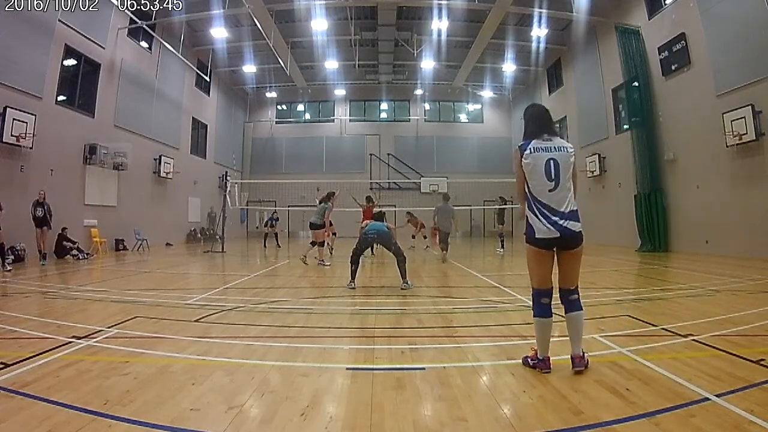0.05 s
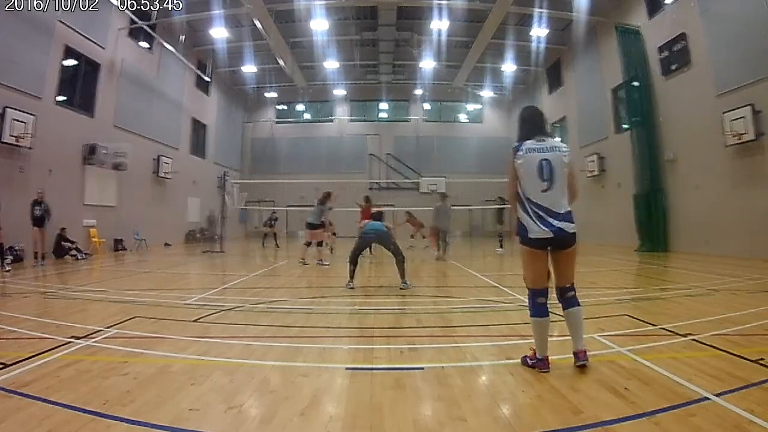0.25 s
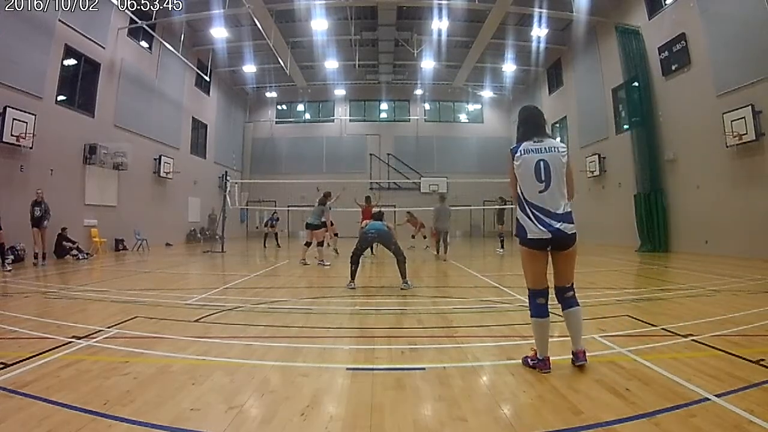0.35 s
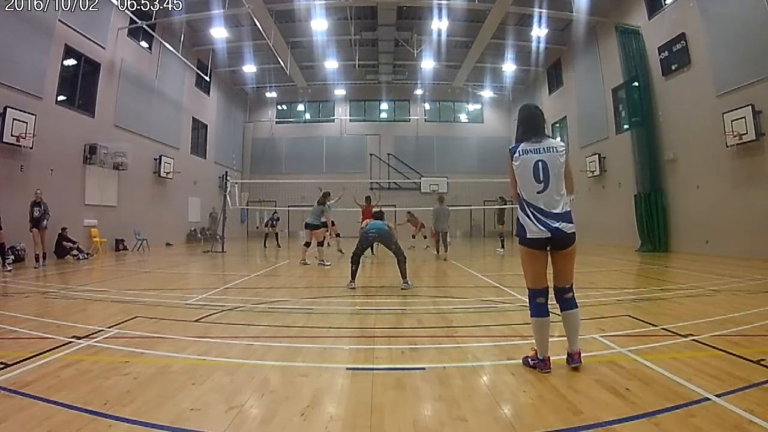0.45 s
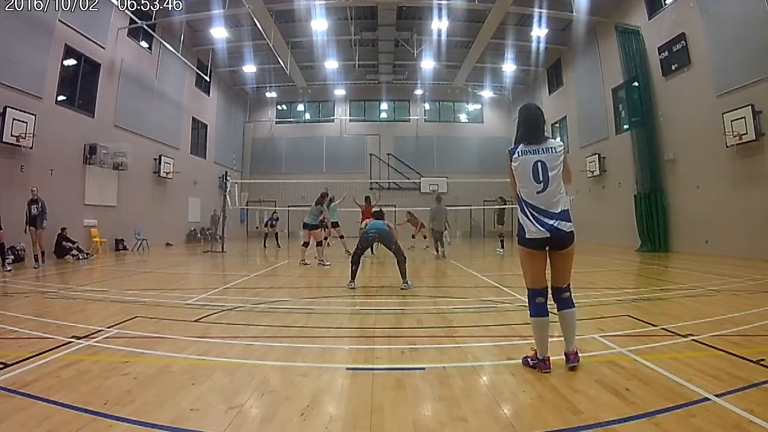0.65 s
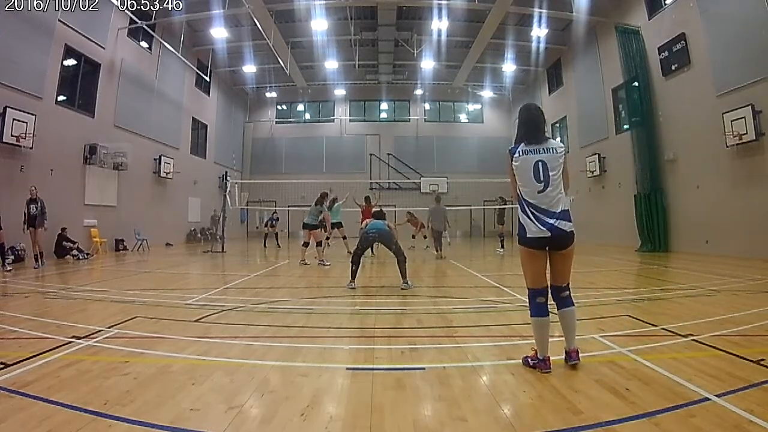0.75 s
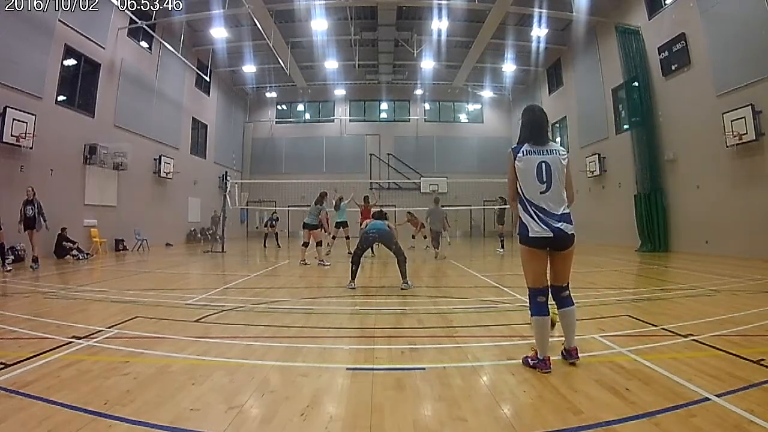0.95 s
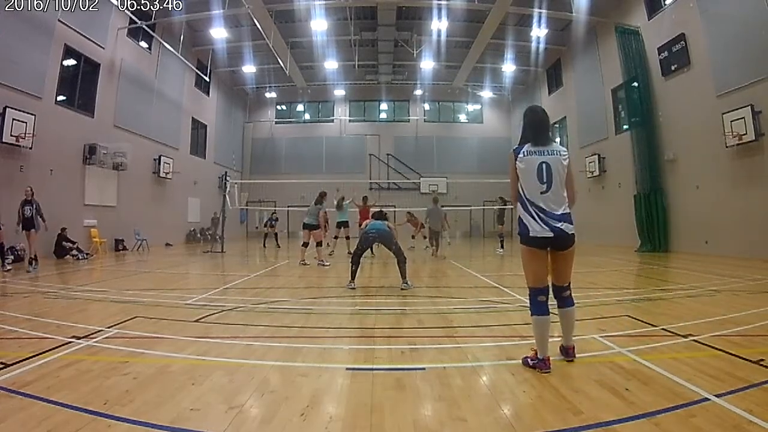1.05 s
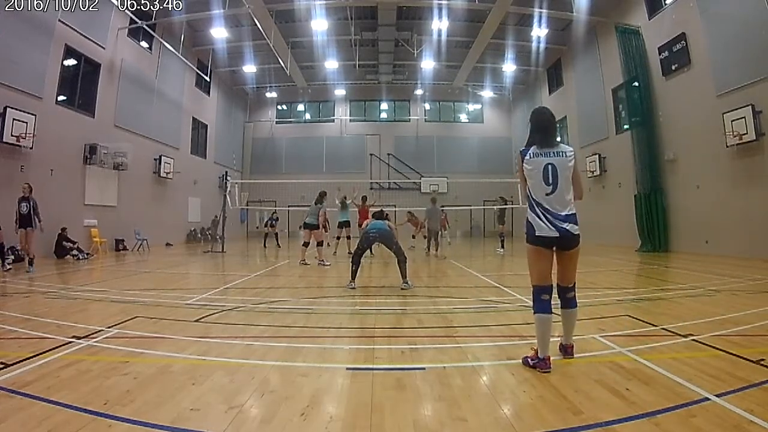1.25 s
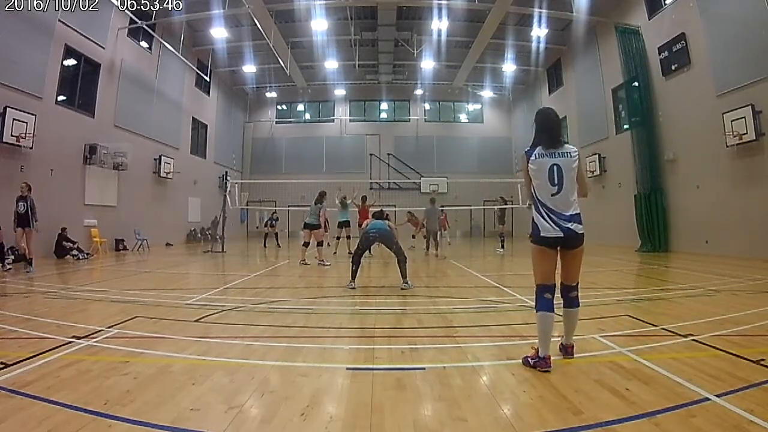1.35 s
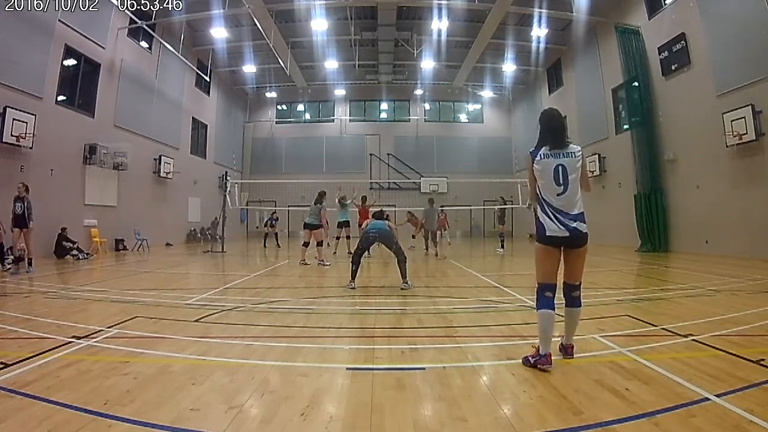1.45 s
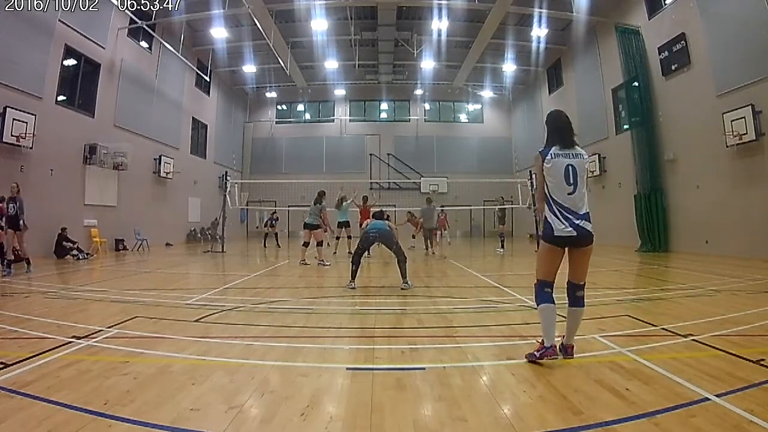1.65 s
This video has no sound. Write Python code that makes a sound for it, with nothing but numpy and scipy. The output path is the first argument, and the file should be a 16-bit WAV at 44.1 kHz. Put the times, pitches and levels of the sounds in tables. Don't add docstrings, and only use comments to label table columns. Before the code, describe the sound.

Two deep, booming ball bounces alternate with lighter palm slaps in an echoing indoor gym.

```python
import sys
import numpy as np
from scipy import signal
from scipy.fft import rfft, irfft, next_fast_len
from scipy.io import wavfile
from scipy.ndimage import uniform_filter1d

SR = 44100
rng = np.random.default_rng(int(sys.argv[2]) if len(sys.argv) > 2 else 0)


def int16_out(signal):
    q = np.round(np.clip(np.atleast_2d(signal).T, -1, 1) * 32767)
    wavfile.write(sys.argv[1], SR, q.astype(np.int16))


def gain_from_db(level_db):
    decades = np.asarray(level_db, float) / 20
    return 10 ** decades


N = 74970
LEAD = 22050


def along(points, hz):
    f, value = np.transpose(points)
    return np.interp(np.log(hz + 1), np.log(f + 1), value)


def coloured(x, points):
    m = 2 * next_fast_len(x.shape[-1] // 2 + 4096)
    log_gain = np.log(gain_from_db(along(points, np.fft.rfftfreq(m, 1 / SR))))
    cepstrum = irfft(log_gain, m)
    cepstrum[1:m // 2] *= 2
    cepstrum[m // 2 + 1:] = 0
    response = np.exp(rfft(cepstrum))
    return irfft(rfft(x, m) * response, m)[..., :x.shape[-1]]


def coloured_evenly(x, points):
    impulse = np.eye(1, 4096)[0]
    return coloured(x, points) / np.linalg.norm(coloured(impulse, points))


def unit(x):
    return x / np.sqrt(np.mean(x ** 2) + 1e-20)


def add(track, s, x):
    part = track[LEAD + round(s * SR):][:len(x)]
    part += x[:len(part)]


def swell(t, swell_s):
    return 1 - np.exp(-t / swell_s)


def ring(hz, db, t60, t, swell_s):
    t = np.clip(t, 0, None)[:, None]
    return gain_from_db(db - 60 * t / t60) * np.sin(2 * np.pi * hz * t) * swell(t, swell_s)


def puff(colour, db, start_s, swell_s, t60):
    u = np.clip(np.arange(SR) / SR - start_s, 0, None)
    noise = unit(coloured(rng.standard_normal(SR), colour))
    return gain_from_db(db - 60 * u / t60) * swell(u, swell_s) * noise


def slap(colour, t60, walls):
    t = np.arange(SR // 10) / SR
    out = np.zeros(len(t))
    direct = (0.000099, 0.021)
    for s, db in [direct, *walls]:
        u = np.clip(t - s, 0, None)
        out += gain_from_db(db - 60 * u / t60) * swell(u, 0.00046) * rng.standard_normal(len(t))
        out += ring(3710, db - 6.5, 0.016, u, 0.0017)[:, 0]
    return coloured_evenly(out, colour)


# frequency in Hz, t60 in seconds.
HALL_DECAY = [(100, 2.3), (300, 0.81), (1000, 2.39), (3500, 1.18), (8000, 2.76)]


def hall(colour, start_s):
    hz, t, z = signal.stft(rng.standard_normal(N + LEAD), SR, nperseg=256)
    decay = gain_from_db(-60 * t / along(HALL_DECAY, hz)[:, None])
    tail = signal.istft(z * decay, SR, nperseg=256)[1]
    u = np.clip(np.arange(len(tail)) / SR - start_s, 0, None)
    early = gain_from_db(-7.5 - 60 * u / 0.59)
    return coloured_evenly(tail * swell(u, 0.004) * (1 + early), colour)


# start in seconds, slap level in dB, boom level in dB, hall level in dB.
BOUNCES = [
    (-.3, -40, -13.5, -58),
    (.189, -23.5, 0, -45),
    (0.9603, -24, -0.76, -44),
]
# frequency in Hz, level in dB, t60 in seconds, side of the node line (sign).
PANELS = [(50.4, -18.9, 0.73, -1), (60.3, -0.8, 1.0, 1), (63.5, -3.4, 0.85, -1), (66.3, -23.4, 1.0, 1),
          (70.8, -27.3, 0.95, -1), (78.4, -8.0, 0.48, -1), (92.4, -15.8, 0.58, -1), (95.7, -7.8, 0.55, 1),
          (102.0, -4.3, 0.65, -1), (112.9, -34.1, 1.0, 1), (132.0, -21.8, 0.37, 1), (135.1, -3.6, 0.09, -1),
          (185.7, -24.3, 0.21, 1), (307.8, -29.4, 0.8, 1)]
# delay after contact in seconds, gain (negative
BOOM_ECHOES = [(.0126, 1), (.0266, -.8082), (.0319, -1.0111), (.0901, -.1921)]
# frequency in Hz, level in dB, t60 in seconds.
BALL_AIR = [(189.3, -13, 0.2), (341, -9, 0.05), (315.8, -26, 0.14), (361.7, -36.5, 0.13),
            (413.7, -33.5, 0.26)]
# frequency in Hz, level in dB.
BOARDS = [(90, -24.5), (135, -3.5), (185, 7), (250, -9.5), (330, -1.5), (500, -18.5), (900, -36),
          (1500, -58)]
# frequency in Hz, level in dB.
END_WALL = [(200, -26.5), (350, 5), (500, -4), (800, -4.5), (1100, -15), (2000, -38)]
# frequency in Hz, level in dB, t60 in seconds.
LINING = [(125.4, -25.5, 1), (136.1, -35.5, 0.99), (161.5, -31, 0.54), (193, -22.5, 0.29)]
# frequency in Hz, level in dB.
FLOOR_SLAP = [(150, -43), (500, -5.5), (900, -4.5), (1500, 1), (3600, -4.5), (6500, -15.5), (7600, -24),
              (12000, -110)]
# delay in seconds, level in dB.
FLOOR_WALLS = [(.012, -14), (.0265, -13), (.0405, -8), (.047, -14), (.058, -15)]


def bounces():
    out, t = np.zeros(N + LEAD), np.arange(SR) / SR
    hz, db, t60, side = np.transpose(PANELS)
    floor = np.zeros(SR)
    for delay_s, gain in BOOM_ECHOES:
        floor += gain * ring(hz, db, t60, t - delay_s, 0.0118) @ side
    floor += puff(BOARDS, db=-25, start_s=0.0199, swell_s=0.005, t60=0.53)
    floor += puff(END_WALL, db=-33, start_s=0.038, swell_s=0.0019, t60=0.19)
    floor += ring(*np.transpose(LINING), t - 0.046, 0.043).sum(axis=1)
    for s, slap_db, boom_db, hall_db in BOUNCES:
        uneven = gain_from_db(1.7 * rng.standard_normal(len(BALL_AIR)))
        thud = ring(*np.transpose(BALL_AIR), t, 0.017) @ uneven
        add(out, s, gain_from_db(boom_db) * (floor + thud))
        add(out, s - 0.0016, gain_from_db(slap_db) * slap(FLOOR_SLAP, 0.022, FLOOR_WALLS))
        add(out, s, gain_from_db(hall_db) * hall(FLOOR_SLAP, 0.014))
    return out


# frequency in Hz, level in dB per Hz.
AIR_HANDLING = [(20, -26), (45, -14.5), (105, 5), (150, -12), (320, -18.5), (500, -24.5), (1400, -34.5),
                (7000, -41)]


def air():
    return gain_from_db(-44.5) * unit(coloured(rng.standard_normal(N + LEAD), AIR_HANDLING))


# start in seconds, slap level in dB, hall level in dB,
# finger snap in dB, cup of the palm in Hz.
PALMS = [
    (0.0465, -31.5, -39.5, 1.5, 1140),
    (0.8029, -28.5, -42, 16.5, 1390),
    (1.6547, -27, -50.5, 4, 760),
]
# frequency in Hz, level in dB.
PALM_SLAP = [(150, 20.5), (350, 7), (900, -1.5), (1400, 2.5), (3600, -6), (5300, -10), (6800, -10.5),
             (7800, -60)]
# frequency in Hz, level in dB.
KNOCK = [(100, -30), (200, 9), (330, 11), (520, -2.5), (800, -21)]
# delay in seconds, level in dB.
HAND_WALLS = [(.0262, -12), (.0376, -3), (.044, -7), (.057, -8)]


def palms():
    out = np.zeros(N + LEAD)
    grid = np.geomspace(100, 12000, num=60)
    for s, slap_db, hall_db, snap_db, cup_hz in PALMS:
        snap = snap_db * np.exp(-(np.log(grid / 3730) / 0.49) ** 2)
        cup = 4.5 * np.exp(-(np.log(grid / cup_hz) / 0.59) ** 2)
        colour = np.c_[grid, along(PALM_SLAP, grid) + cup + snap]
        add(out, s, puff(KNOCK, db=-38, start_s=0, swell_s=0.0023, t60=0.15))
        add(out, s, gain_from_db(slap_db) * slap(colour, 0.045, HAND_WALLS))
        add(out, s, gain_from_db(hall_db) * hall(colour, 0.037))
    return out


# start in seconds, level in dB.
SHOE_TICKS = [
    (1.48, -32.5),
]


def shoe():
    out, t = np.zeros(N + LEAD), np.arange(SR // 4) / SR
    for s, db in SHOE_TICKS:
        add(out, s, ring(3650, db, 0.01, t, 0.0025)[:, 0])
    return out


def scene():
    return (bounces() + air() + palms() + shoe())[None, LEAD:]


def riding_hiss(x):
    level = np.sqrt(np.abs(uniform_filter1d(x ** 2, size=1300)))
    every_s = 1024 / 48000
    off_flare_s = (((np.arange(N) / SR - 0.0102) / every_s + 0.5) % 1 - 0.5) * every_s
    level = level * (1 + gain_from_db(5.5) * np.exp(-(off_flare_s / 0.00095) ** 2))
    white = rng.standard_normal(x.shape)
    tilted = white - 0.17 * np.roll(white, 1, axis=-1)
    return (gain_from_db(-76) + gain_from_db(-44.5) * level) * tilted


# frequency in Hz, level in dB per Hz.
SELF_NOISE = [(500, -16), (2000, 4), (2600, 0.5), (5000, -4.5), (7000, -6.5), (7800, -14)]


def self_noise(shape):
    return gain_from_db(-67) * unit(coloured(rng.standard_normal(shape), SELF_NOISE))


def top_cut(x):
    return signal.sosfilt(signal.butter(12, 12520, fs=SR, output="sos"), x)


# frequency in Hz, level in dB.
HOUSING = [(700, 0), (1400, 5), (1650, -1.5), (2100, 3), (2500, -12.5), (3650, 1.5), (4500, -7.5),
           (6500, -8.5)]


def record(dry):
    x = coloured(dry, HOUSING)
    x = x + riding_hiss(x)
    x = x + self_noise(x.shape)
    in_band = np.fft.rfftfreq(N, 1 / SR) < 12080
    mix = irfft(rfft(x) * in_band, N)
    return top_cut(mix)


dry = scene()
out = record(dry)
int16_out(out)
```